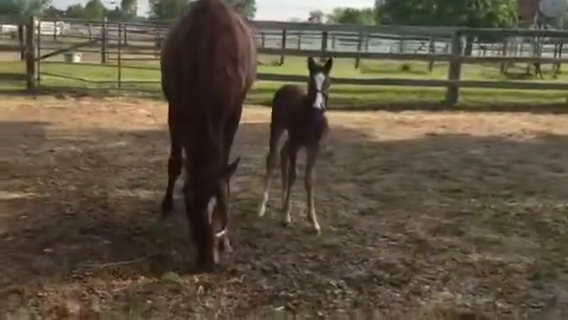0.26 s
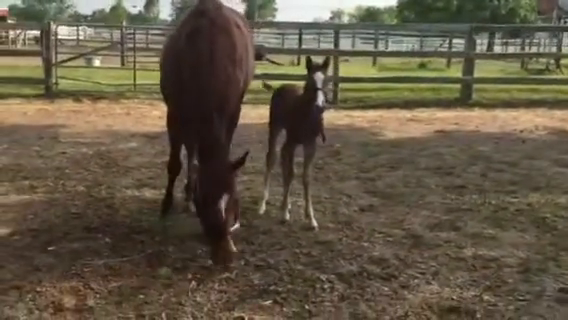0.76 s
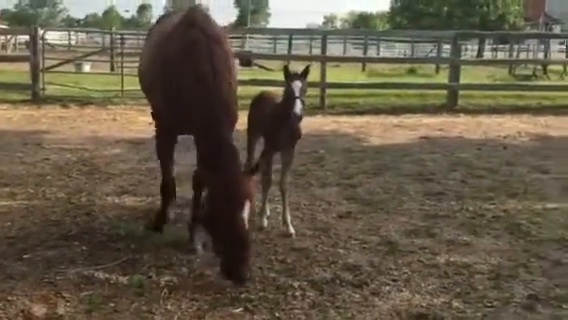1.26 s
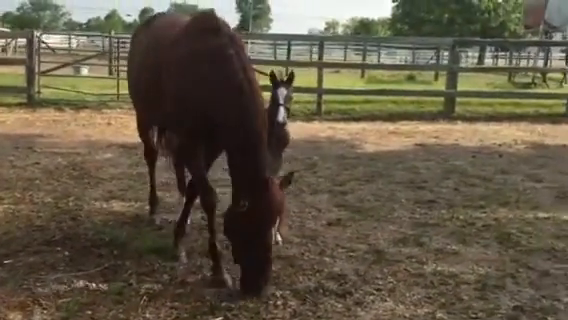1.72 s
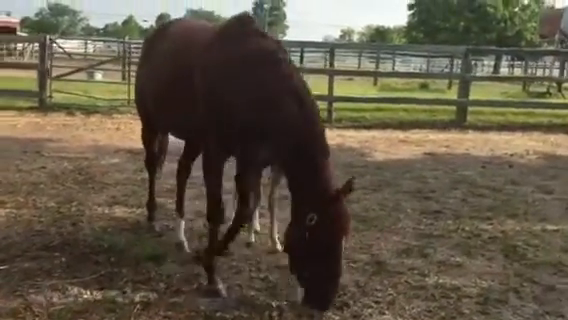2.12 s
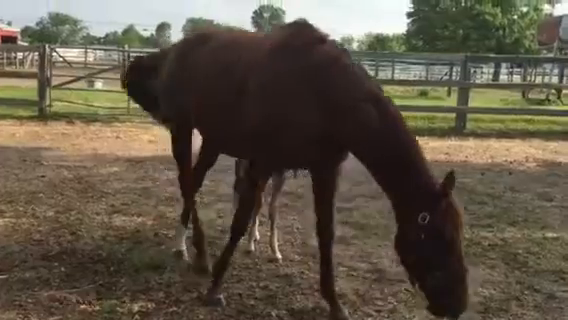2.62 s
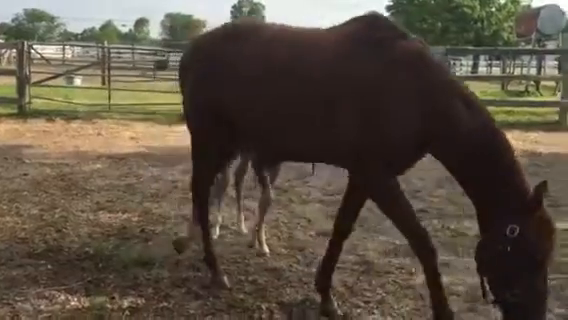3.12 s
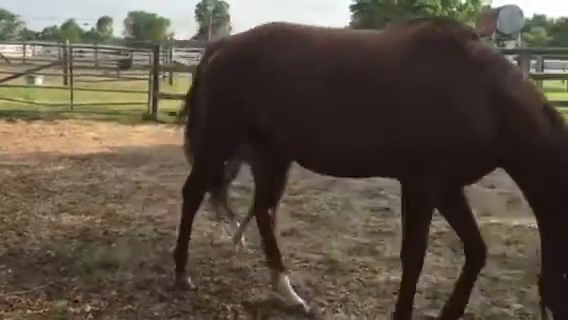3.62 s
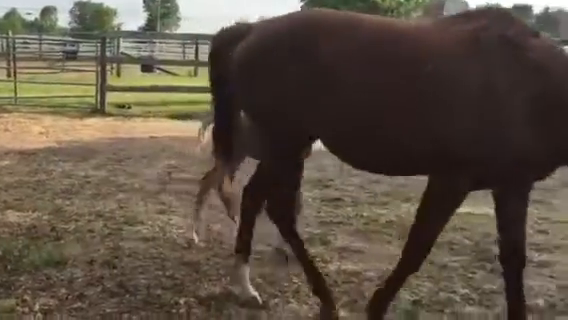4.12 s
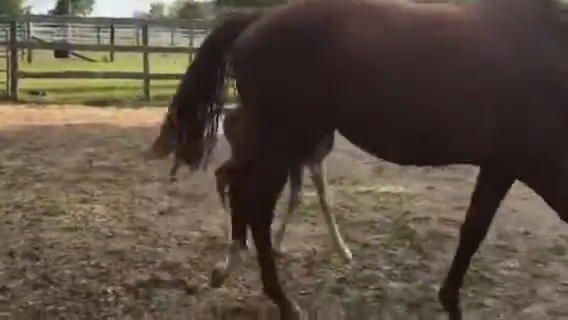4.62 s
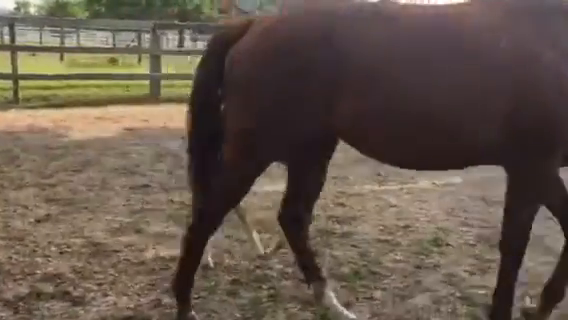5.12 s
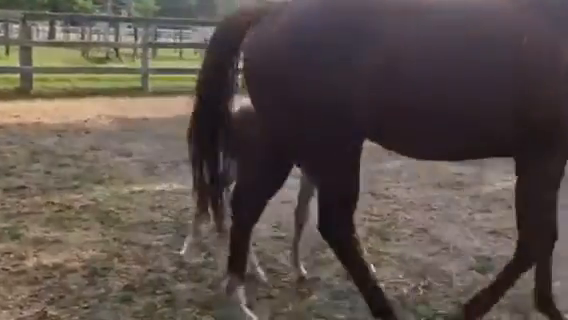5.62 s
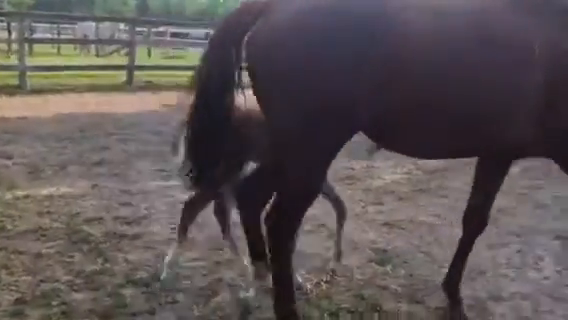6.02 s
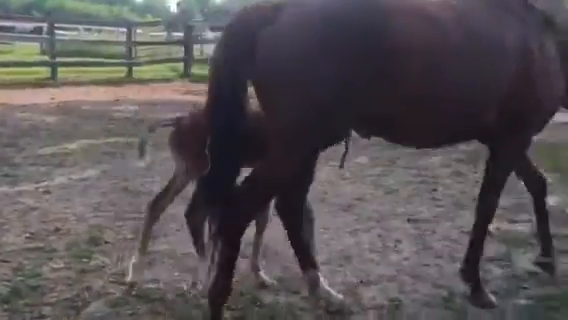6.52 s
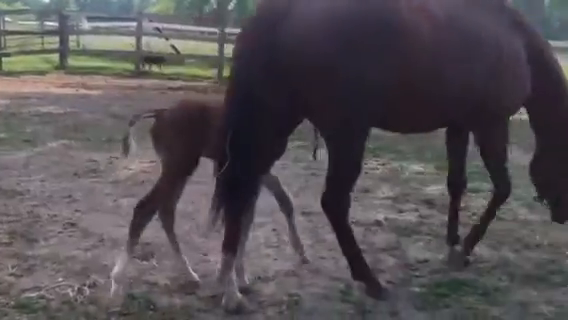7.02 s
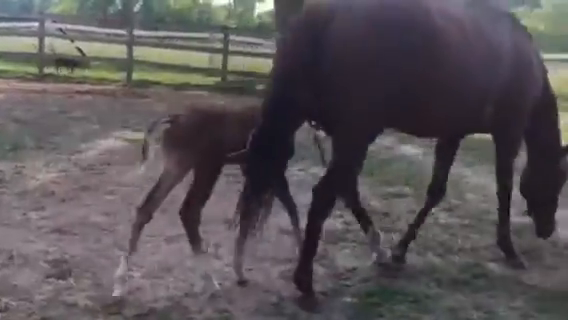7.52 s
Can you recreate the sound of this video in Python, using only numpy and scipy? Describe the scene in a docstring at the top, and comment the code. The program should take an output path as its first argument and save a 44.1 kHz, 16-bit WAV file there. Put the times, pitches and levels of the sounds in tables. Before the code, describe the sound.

One strong, flapping horse snort near the start, followed by soft hoof thuds, scuffs and snapping stalks amid light birdsong outdoors.

```python
"""Mare's snort and walk

A grazing mare snorts once: filtered noise gated by slowing nostril flaps, with slaps and thumps of ringing modes.
She walks past on dry dirt with her foal: sinking tones thud, horn modes knock, shaped grit noise scuffs,
short noise bursts snap. Hair noise swishes once. Sparrows and other birds chirp as arched, warbling tones.
Behind lie noise for rumble, air, litter and leaves, and a far engine hum of two sines."""
import sys
import numpy as np
from scipy import signal
from scipy.fft import rfft, irfft, next_fast_len
from scipy.io import wavfile
from scipy.ndimage import uniform_filter1d, map_coordinates

SR = 44100
rng = np.random.default_rng(int(sys.argv[2]) if len(sys.argv) > 2 else 0)


def unload_audio(sound):
    """Save the sound as a 16-bit wav file, at the path given as the first command line argument."""
    columns = np.transpose(np.atleast_2d(sound))
    # keep every value between -1 and 1, then stretch to whole-number steps
    steps = np.round(np.clip(columns, -1, 1) * 32767)
    wavfile.write(sys.argv[1], SR, steps.astype(np.int16))


N = 342216

# Table levels are relative: trims, random variation and filters follow. Colours are scaled to unit power.
# The blow. Each row: time in seconds, nasal rush in dB, nostril hiss in dB.
BLOW_LEVELS = [(.572, -56, -55.5), (.585, -49.5, -50), (.625, -37, -36), (.668, -30.5, -39),
               (.98, -33.5, -39.5), (1.11, -42.5, -42), (1.165, -47.5, -61), (1.24, -67.5, -51.5)]
# Resonances of the nose. Each row: frequency in Hz, gain in dB.
NOSE_COLOUR = [(88, -32), (150, -1.5), (196, -7.5), (274, -7), (446, -3.5), (530, -2.5), (640, -2),
               (824, -7.5), (956, -2.5), (1110, -7), (1350, -26), (1600, -22), (2080, -58), (3520, -120)]
# Resonances of the nostrils. Each row: frequency in Hz, gain in dB.
NOSTRIL_COLOUR = [(790, -45), (1350, -14), (1870, -6), (2070, -3.5), (2340, -3), (2960, -5), (3490, -4),
                  (4460, -11), (4890, -19.5), (6570, -11.5), (7510, -16.5), (9020, -15.5), (10200, -20.5),
                  (13700, -20), (15500, -30)]
# Air hissing over the nostril rims. Each row: time in seconds, level in dB.
RIM_HISS_LEVEL = [(.51, -88), (.525, -52), (.576, -58), (.584, -50), (.67, -50), (.72, -81), (1.275, -61),
                  (1.3, -90)]
# Colour of that hiss. Each row: frequency in Hz, gain in dB.
RIM_HISS_COLOUR = [(2000, -20), (6500, -3), (15000, -8)]
# Soft nostril walls. Each row: nominal frequency in Hz, level in dB, t60 in seconds.
FLESH_MODES = [(73.4, -6.5, 0.54), (120, 2, 0.067), (202, 4, 0.042), (435, 5, 0.016)]
# Cavity of the closing nostril. Each row: nominal frequency in Hz, level in dB, t60 in seconds.
POP_MODES = [(1020, -6, 0.0052), (2200, -6, 0.019), (2430, 0, 0.016), (3280, -7, 0.014)]
# Wet skin parting. Each row: nominal frequency in Hz, level in dB, t60 in seconds.
SQUEAK_MODES = [(6230, 0.5, 0.011), (9000, -6.5, 0.0073)]

# Weight landing on soil. Each row: start in seconds, level in dB, settled pitch in Hz.
HOOF_THUDS = [(0.429, -42.5, 193), (2.866, -41, 60), (3.032, -41, 60.4), (4.027, -41, 90),
              (4.348, -39, 175), (4.396, -33.5, 86.5), (5.129, -36, 61), (5.152, -40.5, 142),
              (5.839, -36, 63.3), (6.94, -39.5, 61), (7.304, -39.5, 188)]
# Horn meeting packed earth. Each row: start in seconds, level in dB.
HOOF_KNOCKS = [(2.878, -48), (3.812, -45), (3.918, -46), (4.237, -52), (4.76, -40), (5.764, -57),
               (6.112, -57.5), (6.3244, -40.5), (6.3291, -33), (7.27, -48.5)]
# Struck horn. Each row: nominal frequency in Hz, level in dB, t60 in seconds.
HOOF_MODES = [(408, -0.5, 0.028), (610, 5, 0.022), (864, 4, 0.015), (1710, -16, 0.028)]
# Hooves dragged through grit. Each row: start in seconds, length scale in seconds, soil in dB, dry stalks in dB.
HOOF_SCUFFS = [(1.65, 0.046, -85, -68), (2.87, 0.037, -68, -66.5), (3.585, .04, -68, -66.5),
               (3.774, .025, -85, -60), (4.017, .03, -83, -58), (2.621, 0.019, -90, -57),
               (3.275, 0.054, -72, -63.5), (3.513, 0.006, -55, -76), (3.801, 0.027, -55, -53.5),
               (3.838, 0.069, -70, -61.5), (3.907, 0.16, -68.5, -62.5), (4.092, 0.016, -83, -56),
               (4.323, 0.076, -69, -61), (4.712, 0.022, -53.5, -60), (5.069, 0.041, -60, -61.5),
               (5.13, 0.049, -62, -69), (5.265, 0.019, -60, -62), (5.407, 0.016, -56, -63),
               (5.439, 0.014, -51.5, -63), (5.653, 0.021, -64, -59.5), (5.728, 0.018, -57.5, -56.5),
               (5.759, 0.015, -57, -66), (6.111, 0.014, -57.5, -62), (6.151, 0.015, -59, -64),
               (6.172, 0.27, -76, -65), (6.391, 0.024, -49, -65), (6.464, 0.014, -83, -60.5),
               (6.592, 0.017, -60, -70), (6.695, 0.048, -58, -62), (7.025, 0.054, -57, -64),
               (7.183, 0.015, -56, -72), (7.411, 0.014, -57, -70), (7.504, 0.028, -50.5, -55.5),
               (7.606, 0.017, -56, -69), (7.657, 0.058, -62, -80), (7.697, 0.05, -51, -63)]
# Stalks snapping. Each row: start in seconds, level in dB, centre in Hz.
STALK_SNAPS = [(1.3586, -42.5, 5000), (1.8797, -35.5, 2980), (2.147, -44, 8000), (2.879, -50, 2000),
               (3.5154, -38.5, 3500), (3.8078, -38, 7000), (3.8373, -30.5, 9900), (4.0154, -46, 9900),
               (4.236, -37, 3000), (4.3324, -42, 9900), (4.733, -35.5, 3020), (4.7949, -38.5, 5960),
               (5.1518, -44, 8000), (5.314, -45, 9000), (6.1183, -41.5, 4000), (6.1516, -45, 9900),
               (6.204, -42, 9000), (6.468, -38, 9900), (6.7108, -45, 9000), (7.2298, -32.5, 6800),
               (7.61, -36.5, 7000)]
# Colour of soil grit. Each row: frequency in Hz, gain in dB.
SOIL_COLOUR = [(150, -7), (450, -10), (1100, 10.5), (2000, 6), (3500, 3), (7000, -8.5), (15000, -23)]
# Colour of dry stalks. Each row: frequency in Hz, gain in dB.
STALK_COLOUR = [(800, 2), (2500, -1.5), (5000, -1), (8500, 3.5), (10300, -0.5), (12000, 2), (15500, -3.5)]

# One whip of the tail. Each row: time in seconds, level in dB.
TAIL_LEVEL = [(4.888, -120), (4.896, -46.5), (4.925, -54.5), (4.945, -72), (4.97, -120)]
# Colour of coarse hair. Each row: frequency in Hz, gain in dB.
HAIR_COLOUR = [(3000, -20), (9000, -7.0), (13000, -2.5)]

# Two-syllable sparrow chirps. Each row: start in seconds, nominal crest of the first syllable in Hz,
# syllable spacing in seconds, level in dB, accent on the second syllable in dB.
SPARROW_CHIRPS = [(0.073, 4800, 0.06, -60.5, -12), (0.151, 4510, 0.056, -59, -1),
                  (0.398, 4433, 0.047, -44, 1.5), (1.346, 3910, 0.042, -51.5, -6),
                  (1.584, 4810, 0.05, -59, -3), (1.709, 3410, 0.035, -57.5, -10),
                  (2.105, 4230, 0.07, -62.5, 3), (3.088, 4325, 0.054, -55.5, -1.5),
                  (3.612, 4830, 0.051, -59.5, -14), (4.091, 4870, 0.082, -62, -5),
                  (4.273, 4430, 0.049, -57.5, 3.5), (4.61, 4350, 0.043, -57.5, -2.5),
                  (5.028, 4290, 0.056, -54, -4), (5.315, 4305, 0.051, -51.5, 1.5),
                  (5.522, 4660, 0.038, -57, 6), (5.887, 4170, 0.036, -58.5, -6),
                  (6.198, 4510, 0.051, -59, -0.5), (6.482, 4970, 0.04, -53.5, -10),
                  (6.655, 4376, 0.046, -52.5, 0), (7.355, 4440, 0.036, -57, 2.5),
                  (7.503, 4240, 0.048, -54.5, -4), (7.667, 4150, 0.038, -57.5, -14)]
# Single cheeps. Each row: start in seconds, start pitch, crest and end pitch in Hz, length in seconds, level in dB.
SPARROW_CHEEPS = [(0, 4360, 4270, 3920, 0.051, -62), (1.353, 3820, 4000, 4200, 0.0355, -54.5),
                  (1.41, 2814, 2970, 2440, 0.035, -53.5), (1.627, 2730, 3130, 3700, .06, -66),
                  (1.24, 3100, 3500, 3200, 0.086, -56), (1.272, 5400, 4600, 4300, 0.056, -63),
                  (1.748, 3570, 4000, 4800, .045, -66), (1.865, 2720, 3100, 3800, 0.035, -62.5),
                  (2.299, 4280, 3600, 2860, 0.046, -61.5), (2.644, 5080, 4000, 3870, 0.038, -61),
                  (2.69, 3630, 3450, 3300, 0.042, -60.5), (4.174, 2730, 2900, 2680, 0.045, -57.5),
                  (4.389, 3450, 3950, 3600, .07, -59), (5.414, 4400, 4700, 3450, 0.077, -57.5),
                  (5.613, 3180, 3600, 3020, .057, -54.5), (5.892, 2900, 3950, 2900, 0.12, -65),
                  (5.999, 4090, 4400, 3370, 0.032, -59), (6.049, 2690, 2850, 2490, 0.043, -57.5),
                  (6.927, 3020, 3400, 2870, 0.072, -58.5), (7.014, 3580, 4000, 3330, 0.086, -58.5)]
# Level whistle of another bird. Each row: start in seconds, pitch in Hz, length in seconds, level in dB.
WHISTLE_NOTES = [(1.3, 4520, 0.078, -62.5), (1.746, 4700, 0.045, -67), (2.294, 4680, .04, -66),
                 (2.378, 4670, .038, -64), (2.62, 5100, 0.071, -63), (3.645, 4300, 0.14, -64.5),
                 (6.213, 4350, 0.11, -64), (6.72, 4300, 0.13, -60)]
# Faint notes of a tiny bird. Each row: start in seconds, pitch in Hz, level in dB.
TINY_BIRD_NOTES = [(1.68, 6700, -76), (1.755, 6200, -69), (2.085, 5700, -75), (2.275, 6700, -75),
                   (6.85, 5980, -69)]

# Litter stirred by the horses. Each row: time in seconds, level in dB.
STIRRING_LEVEL = [(0, -92), (2, -77.5), (3.4, -75), (3.95, -74.5), (4.55, -72.5), (5.2, -68.5),
                  (5.6, -72.5), (6.3, -71), (6.9, -75), (7.75, -75)]
# Low outdoor rumble. Each row: frequency in Hz, gain in dB.
RUMBLE_COLOUR = [(15, -36), (25, -8.5), (59, 2), (75, 1), (88, -1), (107, -4.5), (143, -5.5), (188, -12),
                 (221, -12.5), (292, -25.5), (365, -24), (441, -32), (500, -29), (650, -53), (1100, -120)]
# Strength of the rumble. Each row: time in seconds, level in dB.
RUMBLE_LEVEL_DB = [(0, -54.5), (.4, -52), (1.5, -53), (3, -51.5), (3.6, -51.5), (6.5, -55), (7.76, -51.5)]
# Soft outdoor air. Each row: frequency in Hz, gain in dB.
AIR_COLOUR = [(180, -19), (300, 5.5), (411, -6), (631, -5), (781, -11.5), (2790, -9.5), (3750, -10.5),
              (5050, -11.5), (8840, -18), (10400, -21), (11500, -19.5), (15500, -22)]
# Distant engine. Each row: time in seconds, firing tone in dB, its octave in dB.
ENGINE_LEVELS = [(0, -50.5, -67), (1.25, -55, -74), (1.5, -71, -69), (2.95, -58, -57.5), (3.7, -75, -75),
                 (7.2, -76, -70), (7.76, -51, -76)]
# Breeze in the trees. Each row: time in seconds, level in dB.
BREEZE_LEVEL = [(0, -84), (1.7, -79), (2.5, -73), (3.05, -70), (3.4, -86)]
# Colour of the leaves. Each row: frequency in Hz, gain in dB.
LEAF_COLOUR = [(150, -10), (320, 6), (1000, -2), (6000, -33)]

FIRST_FLAP_S, FLAP_PERIOD_S, FLAP_SLOWING_S = .699, .0425, .00044
FLAPS_FADE_S, FLAP_FADE_DB_PER_S = 1.02, 237
NOSTRIL_LAG_S, LAG_KEPT = 0.0145, .89  # the second nostril catches up with every flap
FLUTTER_START_S, FLUTTER_ONSET_S, FLUTTER_DB = 0.41, 0.032, 9.5
FLUTTER_DEEPENS_S, DEEPENING_S, FLUTTER_LATE_DB = 0.85, 0.15, 29
SLAP_SCATTER_DB, SLAP_GROWTH_DB_PER_FLAP = 3, -0.29  # negative: the slaps weaken
UNSTICK_S = .581
MODE_VARIES_DB = 2.3

GROUND_T60_S = .3
SNAP_TRIM_DB = -8
CRUMB_TRIM_DB, CRUMB_HZ, CRUMB_CYCLES, CRUMB_SPREAD_DB = -2.5, 1310, 7, 11.5
CRACKLE_PER_S, CRACKLE_SPREAD_DB = 450, 5

# arches: start and end as nominal shares of the crest pitch
FIRST_ARCH, SECOND_ARCH = (.72, .76), (.87, .76)
SYLLABLE_VARIES, SYLLABLE_FILL = 0.0486, 1.02  # arch variation; sounding share of the spacing
SECOND_SHARE = .84  # pitch of the second syllable over the first
SONG_S, LEAD_HZ, LEAD_LENGTH_S, LEAD_DB = 2.545, 6800, 0.076, -67
NOTE_GAP_S, SONG_JITTER_S, SONG_DB, SONG_FADE_DB_PER_S = .047, 0.0056, -62, 14
SONG_END_HZ, SONG_DROP_HZ, SONG_SINK_S = 4760, 855, 0.075
REPLY_DB, REPLY_SPREAD_S, REPLY_LOW_HZ, REPLY_RANGE = -64, 0.14, 2960, 1.8
NEAR_DB, FAR_DB = -45.5, -58  # least blur above about the first, most below the second
BLUR_SHARE, BLUR_T60_S = .45, .12

AIR_DB, DEBRIS_TRIM_DB, DEBRIS_PER_S, STIR_VARIES_DB = -66.5, -4.5, 35, 2.6
ENGINE_HZ = 70.9
TOP_HZ = 15550


def snort():
    """Air rushes through the nose; the nostrils billow, hiss and slap shut one after the other."""
    t = np.arange(N) / SR
    rush_db, hiss_db = curves(BLOW_LEVELS)
    beats, fades_db, lags = flaps()
    onset = ramp(t, FLUTTER_START_S, FLUTTER_ONSET_S)
    deepening = ramp(t, FLUTTER_DEEPENS_S, DEEPENING_S)
    depth_db = FLUTTER_DB * onset + (FLUTTER_LATE_DB - FLUTTER_DB) * deepening
    # the jet is fastest just before a nostril closes
    opening = np.cos(2 * np.pi * np.interp(t + 0.004, beats, np.arange(len(beats))))
    flutter_db = depth_db * opening / 2

    # the nose's resonances move with the nostrils
    retuned = np.cumsum(1 + .07 * opening + .05 * wobble(14))
    nasal = map_coordinates(noise(NOSE_COLOUR), [retuned], mode="wrap")
    rush = nasal * amp(rush_db - 4.5) * chop(0.33 * flutter_db)

    spray = unit(rng.standard_normal(N) + 1.14 * grit(700, 3.9))
    jet = coloured(spray, NOSTRIL_COLOUR) * amp(hiss_db - 1.5 + 0.99 * wobble(400))
    # below 4900 Hz the hiss follows the flaps more closely than above
    cavity = signal.sosfiltfilt(signal.butter(4, 4900, fs=SR, output="sos"), jet)
    hiss = cavity * chop(0.89 * flutter_db) + (jet - cavity) * chop(0.66 * flutter_db)
    hiss += noise(RIM_HISS_COLOUR) * amp(curves(RIM_HISS_LEVEL)[0])
    blowing = np.interp(t, [.49, .56, 1.15, 1.26], [0, 1, 1, 0])

    impacts = nostril_impacts(beats, fades_db, lags)
    return outdoors(blowing * (rush + hiss) + impacts, t60_s=0.25, wet_db=-14.0)


def flaps():
    """Closings slow as the pressure drops: times in s, fades in dB, lags of the second nostril in s."""
    k = np.arange(11)
    s = FIRST_FLAP_S + FLAP_PERIOD_S * k + FLAP_SLOWING_S * k ** 2
    fade_db = -FLAP_FADE_DB_PER_S * np.maximum(s - FLAPS_FADE_S, 0)
    return s, fade_db, NOSTRIL_LAG_S * LAG_KEPT ** k


def chop(gain_db):
    """Flutter gain that keeps the local mean power."""
    gate = amp(gain_db)
    return gate / np.sqrt(uniform_filter1d(gate ** 2, size=2100))


def nostril_impacts(beats, fades_db, lags):
    """Both nostrils slap and thump shut at each flap; wet skin then peels open."""
    slaps, thumps, smacks = np.zeros((3, N))
    add(smacks, UNSTICK_S, amp(-30) * crack(0.0084))  # the nostrils part
    add(thumps, FIRST_FLAP_S - .027, amp(-26.5) * ring(FLESH_MODES, scatter=0.2))  # they first billow open
    for k, (s, fade_db, lag) in enumerate(zip(beats, fades_db, lags)):
        vary_db = SLAP_GROWTH_DB_PER_FLAP * k + fade_db + SLAP_SCATTER_DB * rng.standard_normal()
        tired_db = -82 * max(s - .94, 0)  # the second nostril tires sooner
        add(slaps, s - .001, amp(vary_db - 25) * slap(0.0055))
        add(slaps, s + lag, amp(vary_db - 37.5 + tired_db) * slap(0.0079))
        add(thumps, s, amp(fade_db - 29.5) * ring(FLESH_MODES, scatter=0.162))
        add(thumps, s + lag, amp(fade_db - 31.5) * ring(FLESH_MODES, scatter=0.161))
        add(smacks, s + 0.015, amp(-37 + 0.61 * fade_db) * ring(SQUEAK_MODES, scatter=0.062))
    smacks = signal.sosfilt(signal.butter(1, [4000, 11000], "band", fs=SR, output="sos"), smacks)
    # a small opening radiates no deep bass
    thumps = signal.sosfilt(signal.butter(4, 66, "high", fs=SR, output="sos"), thumps)
    return slaps + thumps + smacks


def slap(t60_s):
    """Wet skin spatters briefly and pops the nostril's cavity at varying pitch."""
    pop = ring(POP_MODES, scatter=.045)
    add(pop, 0, 0.21 * crack(t60_s))
    return pop


def hooves():
    """Weight thuds into the soil, horn knocks on it, and dragged toes crunch grit and stalks."""
    blows, soil, stalks, snaps = np.zeros((4, N))
    t = clock(.4)
    for s, db, hz in HOOF_THUDS:
        add(blows, s, amp(db + 6.0) * thud(hz))
    for s, db in HOOF_KNOCKS:
        add(blows, s, amp(db - 5.5) * ring(HOOF_MODES, scatter=0.026))
    for s, length_s, soil_db, stalk_db in HOOF_SCUFFS:
        u = t / (0.36 * length_s)
        stroke = (u * np.exp(1 - u)) ** 1.5
        add(blows, s, amp(soil_db + CRUMB_TRIM_DB) * stroke * crumbs(.4))
        add(soil, s, amp(soil_db - 1) * stroke)
        add(stalks, s, amp(stalk_db + 0.5) * stroke)
    for s, db, hz in STALK_SNAPS:
        add(snaps, s, amp(db + SNAP_TRIM_DB) * snap(hz))
    clods = amp(2.3 * wobble(220) - 0.5)  # the ground gives way in small lumps
    soil_crunch = coloured(soil * clods * grit(1700, 1.9), SOIL_COLOUR)
    stalk_crunch = coloured(stalks * clods * crackle(7000), STALK_COLOUR)
    return outdoors(blows + soil_crunch + stalk_crunch + snaps, t60_s=GROUND_T60_S, wet_db=-15.0)


def thud(hz):
    """A damped tone whose pitch sags as the soil gives."""
    t = clock(.4)
    cycles = hz * t * (1 + .5 * np.exp(-t / 0.0052))
    envelope = amp(-11.0 * cycles) * (1 - np.exp(-cycles / 0.23))
    return envelope * np.sin(2 * np.pi * cycles)


def crumbs(length_s):
    """Clods crumble in tiny damped ticks around a pitch that differs from call to call, rms 1."""
    size, t = len(clock(length_s)), clock(0.0031)
    when, pitch, strength = rng.random((3, int(1800 * length_s)))
    hz = CRUMB_HZ * np.exp(rng.normal(0, 0.16) + 1.4 * (pitch[:, None] - .5))
    cycles = hz * t
    tick_db = CRUMB_SPREAD_DB * strength[:, None] ** 2 - 60 * cycles / CRUMB_CYCLES
    ticks = amp(tick_db) * np.cos(2 * np.pi * cycles)
    at = (when * size).astype(int)[:, None] + np.arange(len(t))
    return unit(np.bincount(at.ravel(), ticks.ravel(), size)[:size])


def snap(hz):
    """A stalk breaks: a brief crack around the pitch that its thickness sets."""
    band_hz = [hz / 2, min(2 * hz, TOP_HZ)]
    return signal.sosfilt(signal.butter(1, band_hz, "band", fs=SR, output="sos"), crack(0.019))


def crackle(fine_per_s):
    """Sparse uneven cracks among dense, more even ones, rms 1."""
    return unit(grit(CRACKLE_PER_S, CRACKLE_SPREAD_DB) + grit(fine_per_s, 1.8))


def tail_swish():
    """Coarse tail hair whips once across the mare's flank."""
    return amp(curves(TAIL_LEVEL)[0]) * noise(HAIR_COLOUR)


def birds():
    """Nearer calls echo off boards; a flock twitters far off, mostly as scattered echoes."""
    near = chirps() + cheeps_and_whistles() + thin_song() + replies() + high_twitter()
    near = outdoors(fences(near, echo_db=-19.5), t60_s=0.7, wet_db=-8.5)
    return near + outdoors(flock(), t60_s=0.32, wet_db=10.5)


def chirps():
    """Each sparrow chirp is two arched syllables, the second lower."""
    out = np.zeros(N)
    for s, hz, spacing_s, db, accent_db in SPARROW_CHIRPS:
        length_s = SYLLABLE_FILL * spacing_s
        first = syllable(length_s, hz, FIRST_ARCH)
        second = syllable(length_s, SECOND_SHARE * hz, SECOND_ARCH)
        add(out, s, scattered(first, db))
        add(out, s + spacing_s, scattered(second, db + accent_db))
    return out


def syllable(length_s, crest_hz, arch):
    """One arch of a sparrow's chirp, sung with both sides of the syrinx."""
    start, end = np.array(arch) + SYLLABLE_VARIES * rng.uniform(-1.053, 1, size=2)
    path_hz = crest_hz * np.array([start, 1, end])
    main = whistle(length_s, *path_hz, rasp=rng.uniform(0.026, .055))
    return main + amp(-10.0) * whistle(length_s, *(path_hz * 1.12), rasp=0.0473)


def whistle(length_s, start_hz, middle_hz, end_hz, rasp):
    """A tone glides through three pitches; a warble and random quaver shake its pitch and strength."""
    t = clock(length_s)
    u = t / t[-1]
    quaver = np.interp(t, t[::40], rng.standard_normal(len(t[::40])))
    warble = np.sin(2 * np.pi * (rng.uniform(54.6, 106.7) * t + rng.random()))
    path_hz = np.interp(u, [0, .36, 1], [start_hz, middle_hz, end_hz])
    smooth_hz = uniform_filter1d(path_hz, size=len(t) // 6 + 1)
    hz = smooth_hz * (1 + rasp * (quaver + 0.9 * warble))
    strength = np.sqrt(np.abs(np.sin(np.pi * u))) * amp(90 * rasp * (quaver - warble))
    return np.sin(2 * np.pi * np.cumsum(hz) / SR) * strength


def scattered(sound, db):
    """The fainter a call, the farther the bird and the more the leaves smear it, within limits."""
    share = BLUR_SHARE * np.clip((NEAR_DB - db) / (NEAR_DB - FAR_DB), .15, 1)
    t = clock(BLUR_T60_S)
    paths = rng.standard_normal(len(t)) * amp(-60 * t / BLUR_T60_S)
    paths *= np.sqrt(share) / np.linalg.norm(paths)
    paths[0] += np.sqrt(1 - share)
    return amp(db) * signal.fftconvolve(sound, paths)


def cheeps_and_whistles():
    """Single gliding cheeps, and level whistles from another bird."""
    out = np.zeros(N)
    for s, *path_hz, length_s, db in SPARROW_CHEEPS:
        add(out, s, amp(db) * whistle(length_s, *path_hz, rasp=0.031))
    for s, hz, length_s, db in WHISTLE_NOTES:
        add(out, s, amp(db) * whistle(length_s, hz, hz, hz, rasp=0.016))
    return out


def thin_song():
    """One high lead note, then an uneven run of short notes that sink and fade."""
    out = np.zeros(N)
    lead = whistle(LEAD_LENGTH_S, 0.78 * LEAD_HZ, LEAD_HZ, LEAD_HZ, rasp=0.017)
    add(out, SONG_S, amp(LEAD_DB) * lead)
    for since_s in NOTE_GAP_S * np.arange(10):
        hz = SONG_END_HZ + SONG_DROP_HZ * np.exp(-since_s / SONG_SINK_S)
        note = whistle(0.0297, 0.81 * hz, hz, hz, rasp=0.017)
        start_s = SONG_S + since_s + rng.normal(0, SONG_JITTER_S)
        add(out, start_s, amp(SONG_DB - SONG_FADE_DB_PER_S * since_s) * note)
    return out


def replies():
    """A farther sparrow answers each chirp with a thin, mostly falling stroke."""
    out = np.zeros(N)
    draws = rng.random(size=(len(SPARROW_CHIRPS), 3))
    for (s, *_), (wait, pitch, slope) in zip(SPARROW_CHIRPS, draws):
        hz, slide = REPLY_LOW_HZ * REPLY_RANGE ** pitch, .1 - 0.28 * slope
        stroke = whistle(0.046, hz * (.92 - slide), hz, hz * (1.0 + slide), rasp=0.011)
        add(out, s + REPLY_SPREAD_S * wait, scattered(stroke, REPLY_DB))
    return out


def high_twitter():
    """A tiny bird's faint high notes, each rising at the end."""
    out = np.zeros(N)
    for s, hz, db in TINY_BIRD_NOTES:
        add(out, s, scattered(whistle(0.026, hz, hz, 1.1 * hz, rasp=.01), db))
    return out


def flock():
    """Sixty short glides at random times and pitches, the higher ones fainter."""
    out = np.zeros(N)
    for when, pitch, slide in rng.random(size=(60, 3)):
        hz = 3200 * 1.55 ** pitch
        note = whistle(0.055, hz * (0.9 + 0.311 * slide), hz, hz * (1 - 0.197 * slide), rasp=0.036)
        add(out, when * N / SR, amp(-74.0 - 3 * pitch) * note)
    return out


def fences(x, echo_db):
    """Four distinct echoes off nearby boards."""
    out = x.copy()
    for delay_s in rng.uniform(.006, 0.048, size=4):
        add(out, delay_s, amp(echo_db) * x)
    return out


def paddock():
    """Low outdoor rumble, soft air, and litter crackling under the horses' feet."""
    rumble = noise(RUMBLE_COLOUR) * amp(curves(RUMBLE_LEVEL_DB)[0] + 1.5 * wobble(9))
    air = noise(AIR_COLOUR) * amp(AIR_DB + 1.8 * wobble(2.75))
    stir_db = curves(STIRRING_LEVEL)[0] + STIR_VARIES_DB * wobble(25)
    litter = coloured(crackle(2300), STALK_COLOUR) * amp(stir_db - 3.5)
    clods = crumbs(N / SR) * amp(stir_db - 0.5)
    # loose bits tick sparsely
    debris = coloured(grit(DEBRIS_PER_S, 2.3), SOIL_COLOUR) * amp(stir_db + DEBRIS_TRIM_DB)
    return rumble + air + litter + clods + debris


def distance():
    """A far engine hums unsteadily and a breeze stirs the trees."""
    firing_db, octave_db = curves(ENGINE_LEVELS)
    phase = 2 * np.pi * np.cumsum(ENGINE_HZ * (1 + 0.01927 * wobble(8))) / SR
    tones = amp(firing_db) * np.sin(phase) + amp(octave_db) * np.sin(2 * phase)
    engine = np.sqrt(2) * amp(4.1 * wobble(9)) * tones
    leaves = noise(LEAF_COLOUR) * amp(curves(BREEZE_LEVEL)[0] + 1.3 * wobble(13))
    return engine + leaves


def amp(db):
    """Decibels to gain."""
    return 10 ** (np.asarray(db) / 20)


def unit(x):
    """Scale to rms 1."""
    return x / np.sqrt(np.mean(x ** 2) + 1e-20)


def clock(length_s):
    """Sample times of a short sound in seconds."""
    return np.arange(max(int(length_s * SR), 8)) / SR


def ramp(t, start_s, length_s):
    """Rises from 0 to 1."""
    return np.clip((t - start_s) / length_s, 0, 1)


def curves(rows):
    """One value per sample for each column after the time."""
    s, *cols = np.transpose(rows)
    return [np.interp(np.arange(N) / SR, s, c) for c in cols]


def wobble(knots_per_s):
    """A smooth random curve."""
    knots = rng.standard_normal(int(N * knots_per_s / SR) + 4)
    return map_coordinates(knots, [np.arange(N) * knots_per_s / SR])


def add(track, s, sound):
    """Mix a sound into a track at time s in seconds."""
    start = min(max(round(s * SR), 0), N)
    track[start:start + len(sound)] += sound[:N - start]


def coloured(x, points):
    """Minimum-phase filter through (Hz, dB) points that keeps the power of white noise."""
    m = 2 * next_fast_len(N // 2 + SR // 4)
    hz, db = np.transpose(points)
    bins_hz = np.fft.rfftfreq(m, 1 / SR)
    gain = unit(amp(np.interp(np.log(bins_hz + 1), np.log(hz + 1), db)))
    # folding the cepstrum makes the filter causal
    cepstrum = irfft(np.log(gain + 1e-6))
    cepstrum[1:m // 2] *= 2
    cepstrum[m // 2 + 1:] = 0
    return irfft(rfft(x, m) * np.exp(rfft(cepstrum)), m)[:N]


def noise(points):
    """Coloured noise of rms 1."""
    return unit(coloured(rng.standard_normal(N), points))


def grit(cracks_per_s, spread_db):
    """Tiny cracks of uneven size, rms 1."""
    size = amp(spread_db * np.clip(rng.standard_normal(N), -2, 2))
    return unit((rng.random(N) < cracks_per_s / SR) * size * rng.standard_normal(N))


def ring(modes, scatter):
    """Damped modes of a struck body, a little different at every blow."""
    t = clock(0.32)
    out = np.zeros(len(t))
    for hz, db, t60_s in modes:
        envelope = amp(db + rng.normal(0, MODE_VARIES_DB) - 60 * t / t60_s)
        out += envelope * np.sin(2 * np.pi * hz * np.exp(rng.normal(0, scatter)) * t)
    return out


def crack(t60_s):
    """A very short decaying noise burst."""
    t = clock(.04)
    return rng.standard_normal(len(t)) * amp(-60 * t / t60_s)


def outdoors(x, t60_s, wet_db):
    """Scattered echoes from fences, barns and trees as a decaying noise tail."""
    t = clock(.8)
    tail = rng.standard_normal(len(t)) * amp(-60 * t / t60_s) * (1 - np.exp(-t / 0.0011))
    return x + amp(wet_db) * signal.fftconvolve(x, tail / np.linalg.norm(tail))[:N]


def scene():
    """Everything as it reaches one microphone."""
    return (snort() + hooves() + tail_swish() + birds() + paddock() + distance())[None]


def record(dry):
    """Cut the deepest bass and keep nothing from the band limit up."""
    thinned = signal.sosfilt(signal.butter(2, 32, "high", fs=SR, output="sos"), dry)
    m = next_fast_len(N + SR // 2)
    passband = np.fft.rfftfreq(m, 1 / SR) < TOP_HZ
    return irfft(rfft(thinned, m) * passband, m)[..., :N]


dry = scene()
out = record(dry)
unload_audio(out)
```